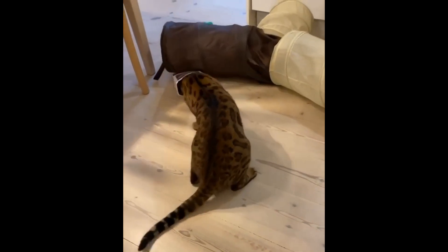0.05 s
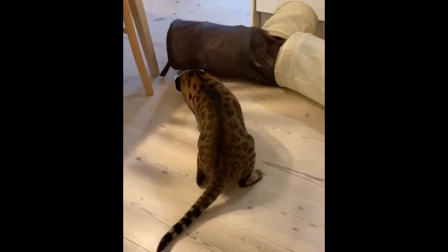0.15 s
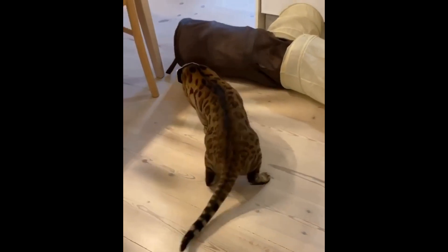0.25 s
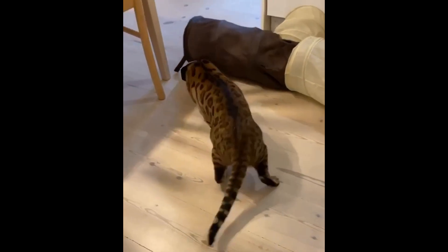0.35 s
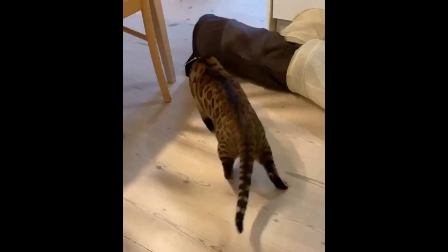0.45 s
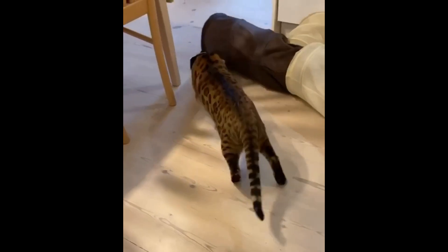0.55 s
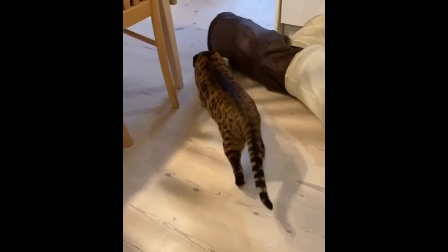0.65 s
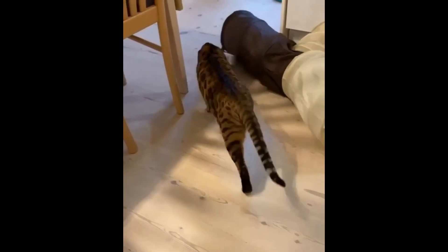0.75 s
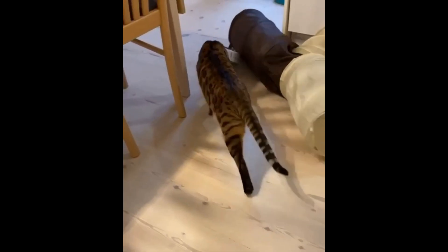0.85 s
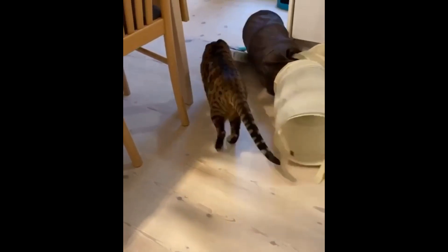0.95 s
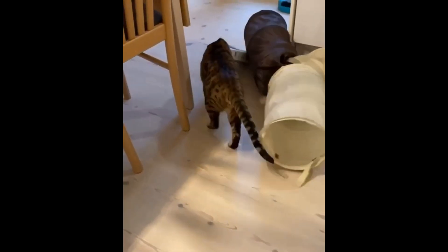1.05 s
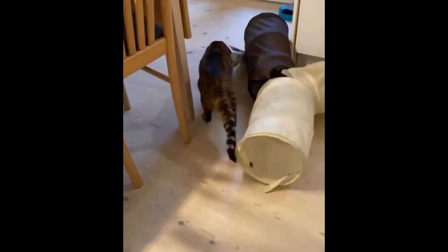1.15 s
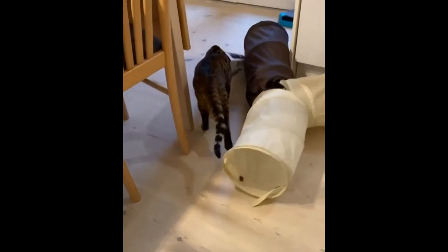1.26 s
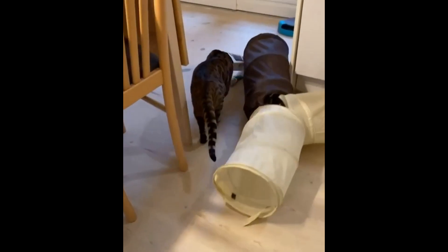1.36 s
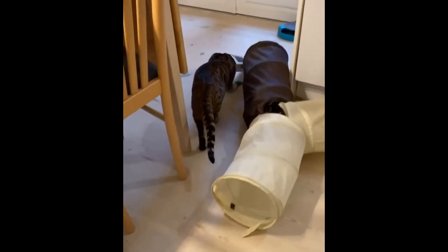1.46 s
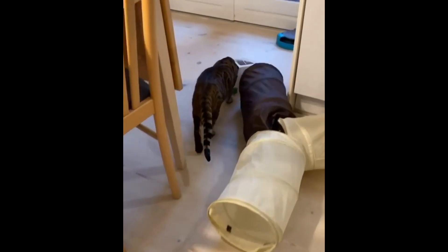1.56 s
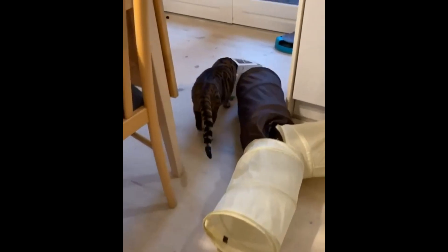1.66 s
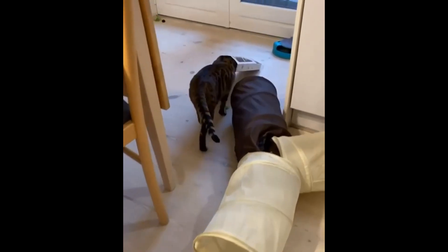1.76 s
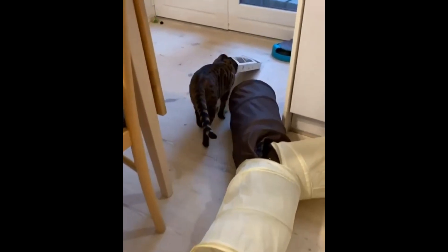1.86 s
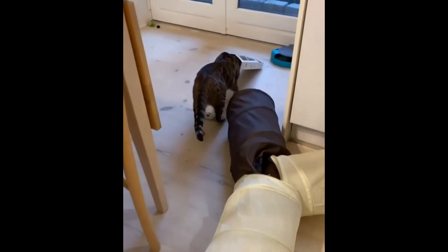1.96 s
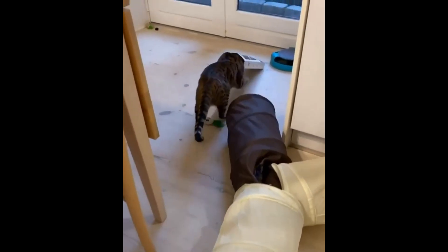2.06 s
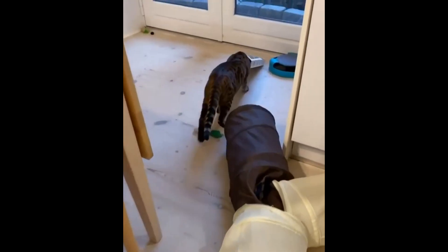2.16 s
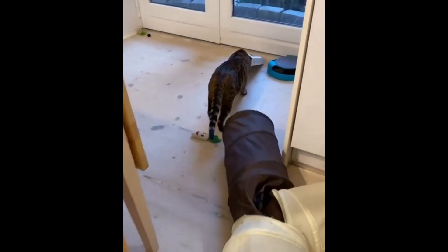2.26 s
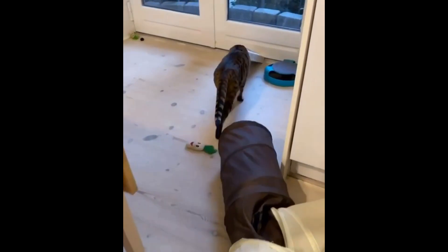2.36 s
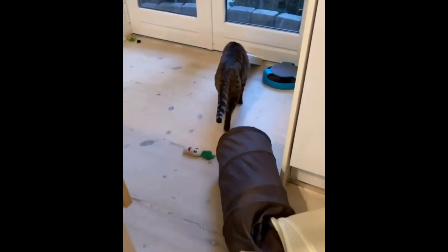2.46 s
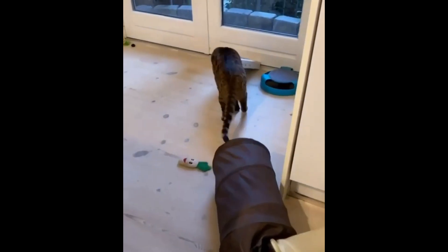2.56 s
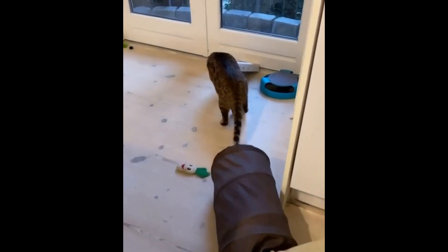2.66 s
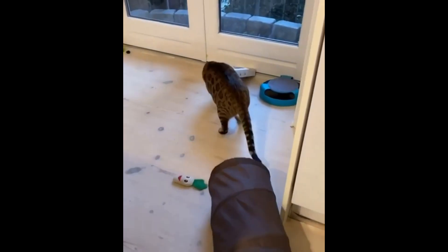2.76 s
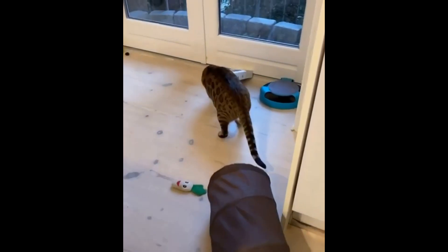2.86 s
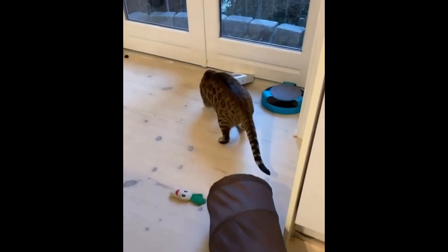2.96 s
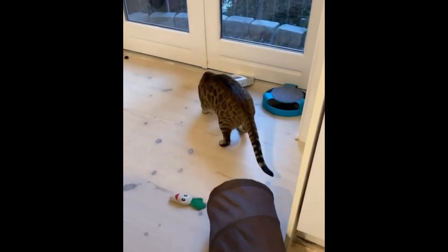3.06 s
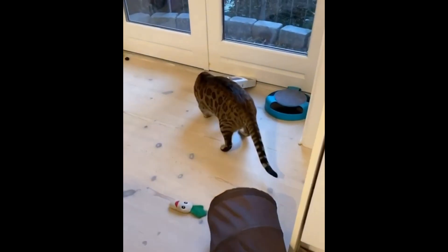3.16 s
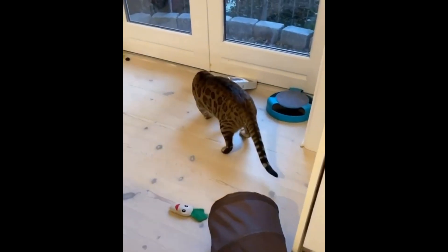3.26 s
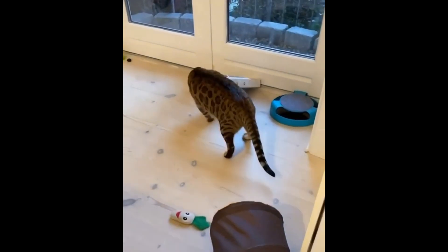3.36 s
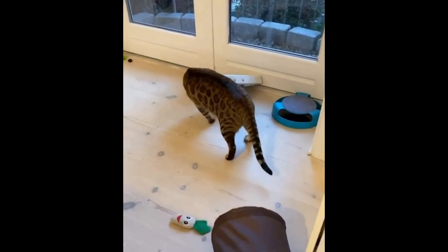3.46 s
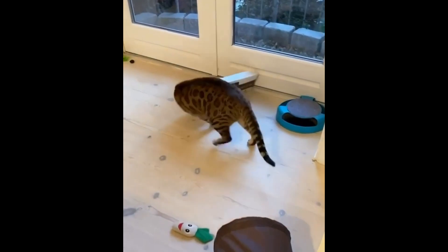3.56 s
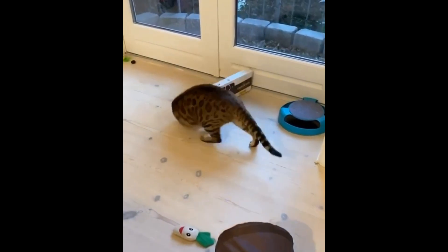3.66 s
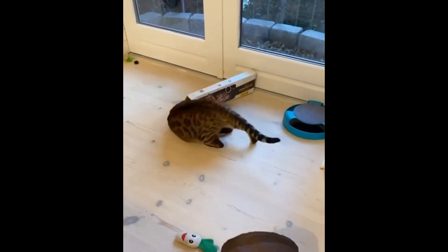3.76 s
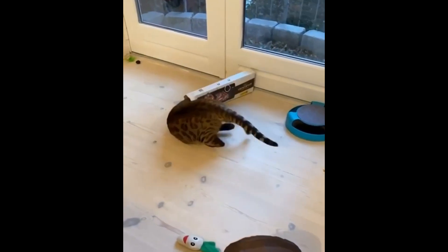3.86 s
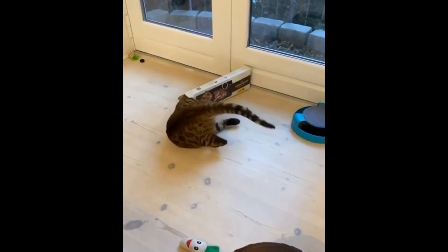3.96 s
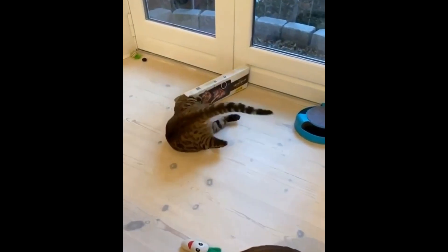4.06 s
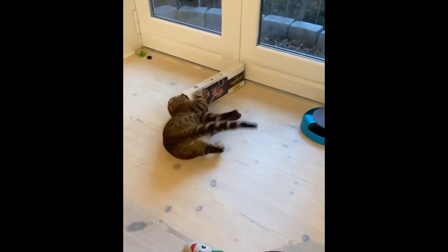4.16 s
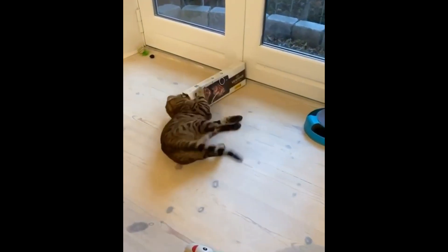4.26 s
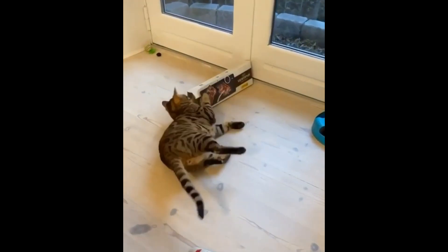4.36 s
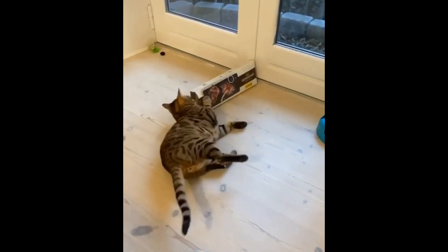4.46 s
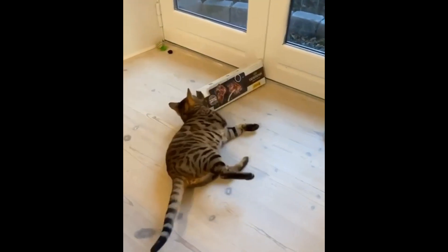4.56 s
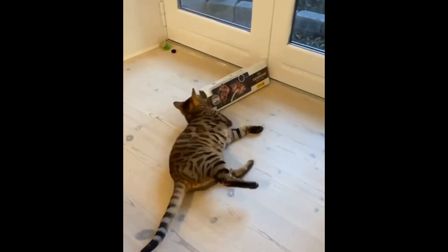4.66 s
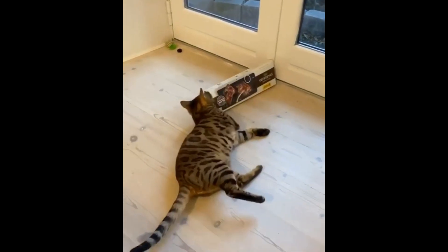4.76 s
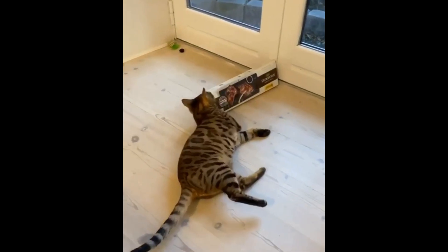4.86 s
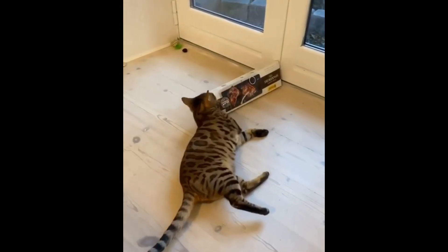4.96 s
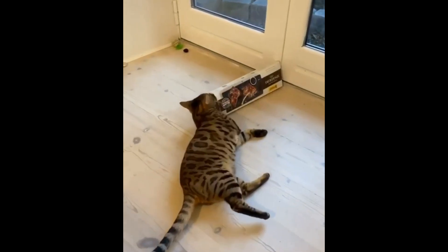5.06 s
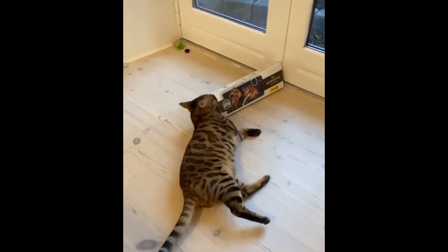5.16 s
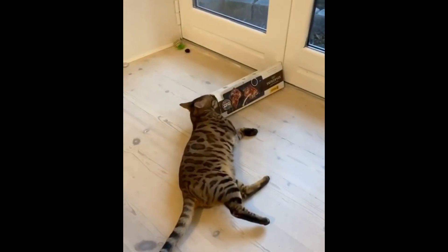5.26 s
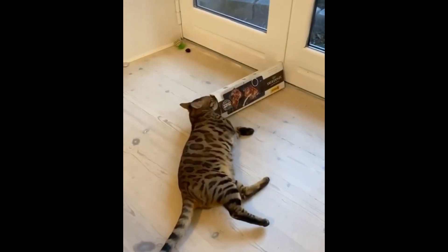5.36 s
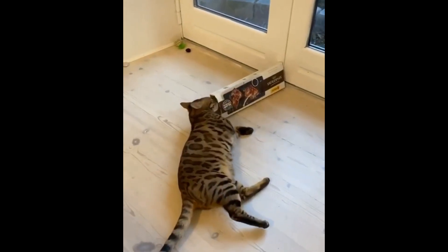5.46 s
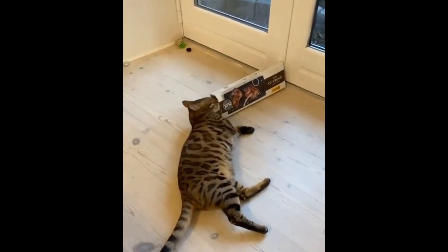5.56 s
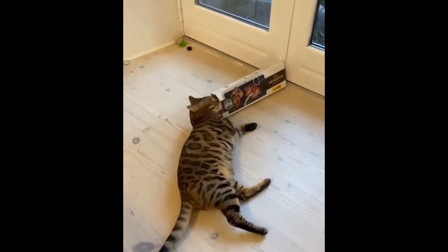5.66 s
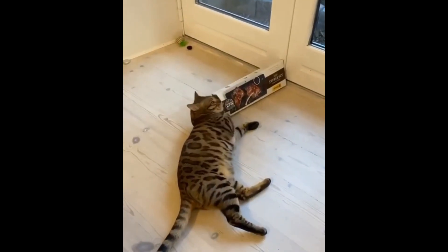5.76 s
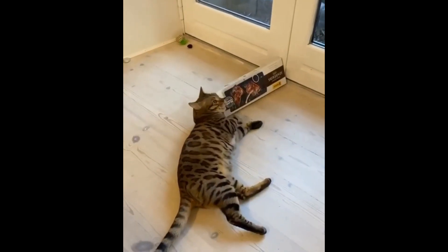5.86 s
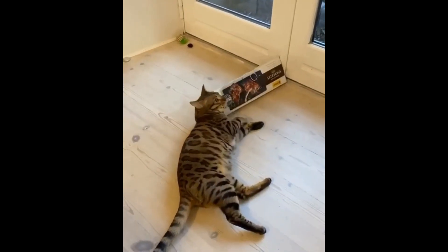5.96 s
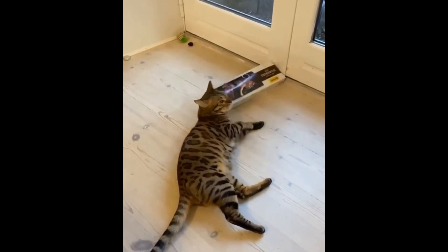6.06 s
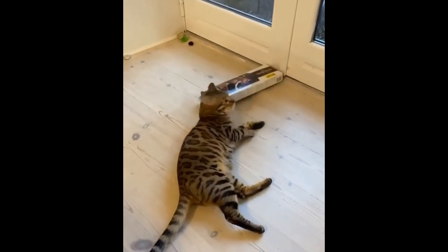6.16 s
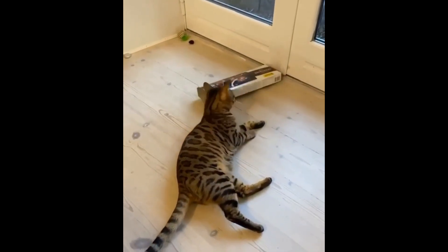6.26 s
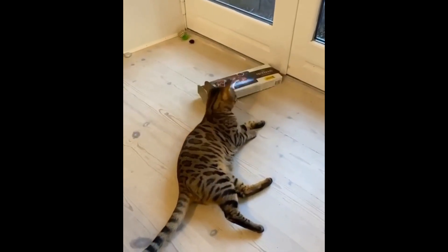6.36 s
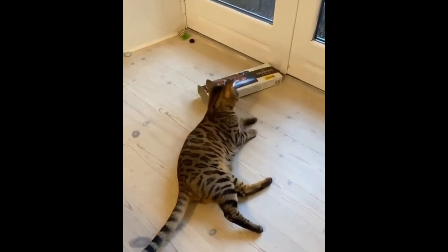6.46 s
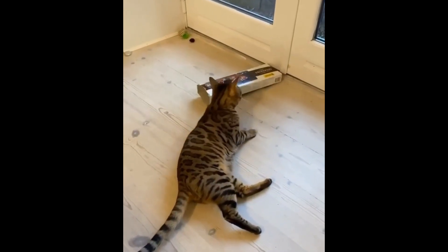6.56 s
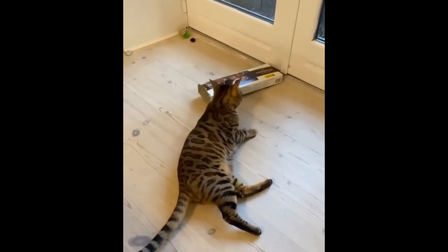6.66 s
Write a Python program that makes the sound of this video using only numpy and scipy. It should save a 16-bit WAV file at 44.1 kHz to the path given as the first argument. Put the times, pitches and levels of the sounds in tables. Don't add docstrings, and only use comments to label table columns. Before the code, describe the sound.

Indoors, cardboard scuffs and drags over bare boards, knocking four times, settling into near silence, before a sharp clicking knock and a last scrape.

```python
import sys
import numpy as np
from scipy import signal
from scipy.fft import rfft, irfft
from scipy.io import wavfile
from scipy.ndimage import uniform_filter1d

SR = 44100
rng = np.random.default_rng(int(sys.argv[2]) if len(sys.argv) > 2 else 0)


def put_to_file(sound):
    columns = np.atleast_2d(sound).T
    safe = np.clip(columns, -1, 1)
    whole_steps = np.round(safe * 32767)
    wavfile.write(sys.argv[1], SR, whole_steps.astype(np.int16))


def how_loud(loudness_db):
    steps = np.asarray(loudness_db, float) / 20
    return 10 ** steps


N = 296352

# [start t/s, length t/s, level/dB, box resonance f/Hz, upper panel level re box/dB]
SHOVES = [(0, 0.31, -58.5, 507, 2), (0.393, 0.4, -59, 520, -2), (0.788, 0.39, -56.5, 442, 3.5),
          (1.077, 0.076, -44, 512, -4), (1.24, 0.2, -61, 470, 1.5), (1.447, 0.065, -60.5, 580, 3),
          (1.573, 0.23, -67.5, 424, 3), (1.815, 0.17, -61, 527, -9), (2.16, 0.32, -68, 466, -3),
          (2.694, 0.1, -70.5, 490, -2), (2.933, 0.11, -60, 535, -1), (3.14, 0.055, -60, 586, -18),
          (3.434, 0.39, -65.5, 566, 8), (3.95, 0.058, -56, 496, -6), (4.058, 0.024, -49.5, 490, -10.5),
          (4.13, 0.17, -67, 534, -1.5), (4.4, 0.34, -77, 523, -17), (4.69, 0.074, -66, 473, -1.5),
          (4.85, 0.09, -78, 547, -6.5), (5.223, 0.16, -75, 527, -2.5), (5.832, 0.12, -72, 503, -5.5),
          (6.022, 0.12, -76, 540, 2), (6.17, 0.09, -62, 430, 4.5), (6.393, 0.12, -57, 430, 1.5),
          (6.632, 0.12, -63, 380, -16)]
# [t/s, level/dB]
SLIDE = [(0, -67), (.7, -65.5), (1.0, -55.5), (1.65, -64.5), (2.1, -69), (2.16, -67.5), (2.45, -67.5),
         (2.83, -73.5), (3.3, -88), (3.45, -73.5), (3.72, -63), (4.3, -70.5), (4.4, -76), (5.15, -99),
         (5.72, -92), (6.02, -67), (6.4, -59), (6.65, -96)]
# [start t/s, length t/s, level/dB]
SCUFFS = [(1.04, 0.016, -50), (1.12, 0.072, -58.5), (2.27, 0.028, -75), (2.89, .18, -71.5),
          (3.67, 0.065, -71), (4.22, 0.083, -71), (4.5, 0.26, -77), (4.7, 0.041, -68.5), (4.88, 0.057, -78),
          (6.03, 0.11, -66.5), (6.66, 0.028, -67.5)]
# [start t/s, length t/s, level/dB]
PAWS = [(.03, 0.18, -50), (.3, 0.48, -57), (.85, 0.37, -50), (1.2, 0.17, -56), (1.4, .13, -54.5),
        (1.58, 0.12, -58), (1.85, 0.21, -55), (2.2, 0.089, -59.5), (2.28, 0.3, -58.5), (2.68, 0.22, -55),
        (2.92, 0.049, -49.5), (3.0, 0.18, -63), (3.15, 0.23, -68), (3.43, 0.31, -60.5),
        (3.95, 0.084, -55.5), (4.08, 0.058, -62), (4.19, 0.12, -57), (4.38, 0.087, -61), (4.5, 0.045, -71),
        (4.6, 0.22, -65), (4.9, 0.18, -78), (5.85, 0.46, -71), (6.4, 0.15, -56), (6.62, 0.054, -54.5)]
# [f/Hz, density level/dB per Hz]
GRIT_SPECTRUM = [(150, -32), (250, -4.5), (443, -4.5), (522, -16.5), (576, -12), (867, -11.5), (1040, -4.5),
                 (9780, -14.5), (11700, -19), (12500, -105), (16200, -98), (22000, -120)]
# [f/Hz, density level/dB per Hz]
BOARD_SPECTRUM = [(15, -82), (25, -45), (54, -4), (128, -3), (263, -4.5), (356, -1), (400, -2), (520, -43),
                  (880, -120)]
# [t/s, blow level/dB, thud level re blow/dB, tick level re blow/dB, rattle length t/s]
KNOCKS = [
    (0.73, -35.5, -11.5, -15.5, 0.025),
    (1.675, -32.5, -11, -12.5, 0.021),
    (2.484, -31.5, -6, -12, 0.031),
    (3.746, -22, -7.5, -14.5, 0.019),
    (6.261, -27.5, -5.5, -11, 0.037),
    (6.523, -41, -5.5, -20, 0.018),
]
# [f/Hz, level/dB, t60 t/s]
LOW_RINGS = [
    [(152, 13.5, 0.2), (202, 0, 0.28), (318, -26, 5.0), (418, 4, 1.9)],
    [(149, 2.5, 0.19), (214, -30, 0.72), (310, 2.5, 0.18), (365, -1, 0.15)],
    [(90.2, -23, 0.76), (126, -3, 0.25), (185, 5.5, 0.38), (193, -16, 0.75), (380, 2, 0.34)],
    [(152, 5, 0.3), (184, 0.5, .5), (264, -21, 2.6), (344, -28, 0.8)],
    [(155, -3, 0.3), (272, -3, 0.94), (358, -6, 0.17), (350, -7, 0.18), (419, 4.5, .5)],
    [(108, -25, 5.0), (181, -5, 0.36), (350, 7, 0.34)],
]
# [f/Hz, level/dB, t60 t/s]
HIGH_RINGS = [
    [(696, -31, 0.77), (1420, -21, 2.0), (1690, -11, 0.056), (1990, 0.5, 2.5)],
    [(540, 5.5, 1.4), (1033, 1.5, 1.6), (1300, -5, 0.17), (1700, -32, 0.89)],
    [(470, 3, 0.079), (657, -14, 0.3), (970, -4, 0.99), (1900, -17, 0.24)],
    [(598, 5, 0.89), (718, 2, 0.19), (910, -47, 0.49), (1114, -24, 0.083), (1273, -12.5, 0.18),
     (2030, -16, 0.03)],
    [(503, -30, 0.99), (710, 8.5, 0.68), (1041, 5, 0.87), (1940, -24, 0.68)],
    [(490, -9, 0.16), (767, -2, 5.0), (1044, -36, 1.3)],
]
DULL_HZ = [2320, 2400, 1850, 2380, 1010, 930]
CRACK = [.47, 0.01, 0.37, 0.58, 0.29, 0.6]
# [t/s, blow level/dB, thud level re blow/dB, tick level re blow/dB, ring f/Hz]
TAPS = [(0.435, -53, -11, -29, 765), (0.548, -47.5, -7, -17, 745), (1.043, -49.5, -9.5, -4, 284),
        (1.437, -51, -34, -35, 810), (2.307, -55.5, -1, -13, 255), (2.856, -67, -16, -4, 598),
        (2.895, -49.5, -10.5, -11, 397), (2.939, -63, -14, -18, 250), (3.694, -48.5, -23.5, -11, 790),
        (4.058, -50.5, -8, -14.5, 468), (4.201, -53, -7, -33, 234), (6.156, -51.5, -14, -10, 816),
        (6.672, -70, 4, -14, 336)]
# [f/Hz, density level/dB per Hz]
CARD_SPECTRUM = [(25, -52), (45, -24.5), (150, -12.5), (600, -10), (1000, -17.5), (1700, -31),
                 (3000, -30.5), (6000, -59)]
# [f/Hz, density level/dB per Hz]
TICK_SPECTRUM = [(700, -9), (1300, 5.5), (2500, -2.5), (4500, -12), (7000, -20), (9500, -21), (11600, -31),
                 (12600, -63)]
# [t/s, level/dB, f/Hz, length t/s]
REBOUNDS = [(2.488, -34.5, 175, 0.015), (3.776, -24.5, 154, 0.022), (4.076, -47.5, 105, 0.013),
            (6.242, -42, 250, 0.018), (6.268, -32.5, 345, 0.024), (6.54, -47.5, 186, 0.021),
            (2.948, -62.5, 910, 0.036), (1.135, -46, 880, 0.022), (1.11, -46, 540, 0.029),
            (1.435, -46.5, 850, 0.011), (6.41, -53, 142, 0.03), (1.70, -50, 77.6, 0.062),
            (6.272, -40, 165, 0.023), (4.198, -53, 229, 0.018), (4.055, -51, 480, 0.015),
            (3.77, -36, 84, 0.029), (3.76, -46.5, 45, .05), (1.69, -54, 46, .04), (2.53, -47, 83, 0.045),
            (2.9, -53, 73, 0.031), (3.75, -29.5, 256, .007), (3.747, -32, 660, 0.012),
            (3.785, -35.5, 600, .016), (3.82, -38, 630, .016), (3.88, -47, 620, .025),
            (2.515, -39.5, 401, 0.013), (2.545, -41, 205, .014), (2.58, -44.5, 202, .014),
            (2.64, -51.5, 220, 0.028), (2.54, -52.5, 950, 0.012), (1.085, -51, 466, 0.011),
            (1.455, -53, 770, 0.011), (1.5, -54.5, 800, 0.013), (1.682, -38.5, 325, 0.01),
            (3.17, -61.5, 730, 0.028), (6.522, -47, 450, .008), (6.54, -47, 345, 0.014),
            (6.147, -54.5, 150, .02), (6.67, -57, 340, .015), (4.01, -51.5, 110, 0.032),
            (2.73, -56.5, 215, 0.029), (6.3, -38.5, 450, .014), (6.33, -40.5, 258, 0.018),
            (4.2, -55, 150, 0.046)]
# [t/s,
# level/dB, f/Hz, width f/Hz, length t/s]
TICKS_AND_RUSTLES = [(6.1585, -34.5, 4980, 420, 0.003), (6.159, -44, 7200, 1100, 0.0027),
                     (6.15, -44, 1500, 660, 0.016), (6.262, -31, 5760, 480, 0.0019),
                     (6.262, -29, 7530, 690, 0.0016), (6.262, -34.5, 10830, 1310, 0.00193),
                     (3.749, -43.5, 10200, 2600, 0.0087), (0.93, -66, 1680, 4600, 0.033),
                     (6.522, -59, 720, 300, 0.003), (2.6, -51, 2900, 3000, 0.0012), (0.68, -56, 4600, 3400, .014),
                     (1.667, -44, 2800, 3200, .012), (6.262, -44, 14000, 1500, .002), (5.492, -72, 2900, 500, .025),
                     (0.735, -48.5, 2500, 1800, .02), (1.677, -39, 3500, 1700, 0.014),
                     (1.695, -44.5, 3900, 2400, .02), (3.752, -48, 7600, 1300, 0.0055),
                     (3.755, -38.5, 1900, 1100, .02), (1.045, -56, 6600, 5000, .004),
                     (2.897, -54.5, 2600, 3400, .006), (2.856, -59, 2400, 1800, .005),
                     (2.97, -63, 1600, 1400, 0.055), (1.1, -52, 4500, 3000, .02), (3.76, -45.5, 2400, 1100, 0.032),
                     (1.47, -56, 1200, 400, .02), (2.895, -58, 6500, 1500, .004),
                     (2.896, -60, 4500, 700, .008), (2.894, -61, 9500, 2500, .005), (2.904, -62, 4500, 700, .025),
           (2.903, -64, 6600, 900, 0.023), (2.918, -66, 10000, 2500, 0.032),
           (6.158, -47, 9500, 900, 0.0038), (6.163, -47.5, 4900, 700, .018), (6.162, -49, 2110, 900, .02),
           (5.953, -65, 2500, 1200, 0.022), (5.99, -66, 3010, 1200, .03), (6.0, -58, 9400, 1800, .04),
           (6.04, -55, 8300, 1800, .05), (6.09, -58, 9500, 2500, .05), (6.11, -59, 6500, 1500, .04),
           (6.22, -54, 2260, 1200, 0.03), (6.268, -39, 3700, 700, .005), (6.27, -43, 7900, 900, .005),
           (1.676, -38, 2260, 1200, .006), (1.686, -37.5, 2240, 1200, 0.0075),
           (1.688, -40.5, 2900, 1400, 0.029), (1.72, -50.5, 3800, 2000, 0.044),
           (3.745, -28.5, 1040, 400, .004), (3.769, -38, 1304, 200, .018), (3.779, -36, 1760, 300, .012),
           (3.826, -43, 1334, 400, .01), (3.752, -30, 182, 50, 0.014), (3.78, -36, 365, 60, .016),
           (2.49, -37, 185, 50, .03), (5.5, -75.5, 1900, 500, 0.053), (3.75, -35, 1700, 800, 0.024),
           (3.79, -43, 1800, 900, 0.051), (.742, -49, 1700, 900, .04), (0.779, -56, 2000, 1000, 0.045),
           (1.461, -50.5, 1081, 300, .04), (5.953, -64, 7500, 2500, .04), (6.2, -55.5, 7400, 1500, .05),
           (6.23, -52, 4500, 2500, .03), (.726, -51, 2900, 1500, .006), (2.475, -49, 1800, 1800, .008),
           (6.291, -45, 5800, 1200, 0.023), (6.311, -42, 3300, 1200, 0.019),
           (6.365, -50.5, 5200, 1000, .02), (6.39, -49.5, 1300, 500, .035)]
# [t/s, level/dB, f/Hz, width f/Hz]
TAIL_SWEEP = [
    (5.47, -108, 2950, 1300),
    (5.495, -84, 2950, 1400),
    (5.54, -88, 2800, 1350),
    (5.575, -102, 2700, 1300),
    (5.595, -104, 2080, 350),
    (5.61, -90, 2060, 350),
    (5.67, -97, 2050, 350),
    (5.7, -89, 1920, 350),
    (5.76, -101, 1900, 350),
    (5.85, -108, 1900, 350),
]
# [f/Hz, t60 t/s]
ROOM_T60 = [(60, 0.46), (250, 0.43), (700, 0.42), (2000, 0.48), (6000, 0.45), (12000, 0.49)]
# [f/Hz, side minus mid level/dB]
WIDE = [(60, -18.5), (130, -14), (270, -5.5), (590, 2), (1250, 2), (2680, -0.5), (5740, 0.5), (12300, -25)]
# [f/Hz, left minus right level/dB]
LEAN = [(60, 0.5), (170, -2), (500, 2), (1460, 1.0), (4230, 1.5), (12300, -0.5)]
# [f/Hz, density level/dB per Hz]
AIR_SPECTRUM = [(15, -62.5), (40, 3.5), (147, 2), (200, -7.5), (296, -3.5), (472, -15.5), (597, -7),
                (662, -21), (928, -25), (1200, -20.5), (1560, -27), (1870, -30), (12500, -36.5),
                (16200, -84), (22000, -120)]
# [f/Hz, level/dB]
HUM = [(150.7, -80.5), (301.5, -89), (414.5, -87.5), (597.5, -80)]

AIR_DB = -70.5
PANEL_HZ = 733
EDGE_HZ = 11800
ATTACK_S, RELEASE_S = 0.022, 0.022
CHANGE_S = 0.024
RISE_SHARE, TAP_S = 0.23, 0.013


def drag():
    t = np.arange(N) / SR
    start, length, level, box_hz, panel_db = np.transpose(SHOVES)
    middle = start + length / 2
    box_hz, panel_db = np.interp(t, middle, box_hz), np.interp(t, middle, panel_db)
    slide = how_loud(np.interp(t, *np.transpose(SLIDE)))

    sizes = how_loud(2.5 * np.minimum(rng.exponential(1, N), 3.6))
    happens = rng.random(N) < 1500 / SR
    slips = sizes * happens * rng.choice([-1, 1], N)
    grip = how_loud(1.13 * evened(uniform_filter1d(rng.standard_normal(N), 900)))
    rub = grip * (evened(slips) + 0.6 * rng.standard_normal(N))

    hollow = evened(resonate(resonate(rub, box_hz, 210), box_hz, 300))
    panel = evened(resonate(resonate(rub, PANEL_HZ, 310), PANEL_HZ, 940))
    panel = panel + 0.6 * colour(rub, GRIT_SPECTRUM, lo_hz=900, hi_hz=1900)
    hiss = colour(rng.standard_normal(N) + 0.39 * rub, GRIT_SPECTRUM, lo_hz=1550)
    joists = evened(resonate(rub, 90, 25) + resonate(rub, 159, 27))
    rumble = how_loud(-2.0) * (colour(rub, BOARD_SPECTRUM, hi_hz=313) + 0.53 * joists)

    box_gain = strokes(zip(start, length, level)) + how_loud(-12.5) * slide
    box = box_gain * (hollow + how_loud(panel_db) * panel)
    return box + (slide + strokes(SCUFFS)) * hiss + strokes(PAWS) * rumble


def strokes(rows):
    t, gain = np.arange(N) / SR, np.zeros(N)
    for s, length, db in rows:
        swell = np.clip((t - s) / ATTACK_S + 1, 0, 1) ** 2
        fade = np.exp(-np.maximum(t - s - length, 0) / RELEASE_S)
        gain += how_loud(db) * swell * fade
    return gain


def knock(s, blow_db, thud_db, tick_db, length, rise, rings, dull_hz, crack=0.47):
    t = np.arange(16384) / SR
    onset = np.exp(-t / rise)
    shape = (1 - onset) * np.exp(-t / length) + crack * np.exp(-t / 0.0036)
    noise = rng.standard_normal(len(t))
    unevenness = evened(uniform_filter1d(rng.standard_normal(len(t)), 150))
    rattle = noise * how_loud(3.25 * unevenness)

    ring = np.zeros(len(t))
    for hz, db, t60 in rings:
        ring += how_loud(db) * evened(resonate(rattle * shape, hz, 34 + 1.45 / t60))
    body = evened(ring) + how_loud(-0.5) * evened(colour(rattle, CARD_SPECTRUM) * shape)
    body = signal.lfilter(*signal.butter(2, dull_hz, fs=SR), body)
    low = signal.lfilter(*signal.butter(2, 300, fs=SR), body)
    thud = low * (1 - np.exp(-t / 0.0048))

    tick_shape = (1 + 0.35 * crack - onset) * np.exp(-t / (0.53 * length))
    tick = colour(rattle, TICK_SPECTRUM, lo_hz=1500) * tick_shape
    layers = peaked(body - low) + how_loud(thud_db + 7.0) * peaked(thud) + how_loud(tick_db + 5.5) * peaked(tick)
    return s, how_loud(blow_db) * layers


def burst(hz, width, length):
    t = np.arange(8192) / SR
    push = rng.standard_normal(len(t)) + 0.13 * np.cos(2 * np.pi * hz * t)
    push = push * t / length * np.exp(-2 * t / length)
    return peaked(resonate(resonate(push, hz, width), hz, 3 * width))


def tail_sweep():
    s, *columns = np.transpose(TAIL_SWEEP)
    t = np.arange(s[0], s[-1], 1 / SR)
    db, hz, width = (np.interp(t, s, c) for c in columns)

    def brush(band):
        noise = rng.standard_normal(len(t))
        for _ in range(3):
            noise = resonate(noise, hz, band)
        return evened(noise)

    broad, narrow = brush(width.max()), brush(width.min())
    share = (width - width.min()) / np.ptp(width)
    return s[0], how_loud(db) * (np.sqrt(share) * broad + np.sqrt(1 - share) * narrow)


def room():
    taps = np.zeros((2, SR))
    slots = np.arange(160, SR - 20, 20)
    at = slots + rng.integers(0, 20, (2, len(slots)))
    np.put_along_axis(taps, at, rng.choice([-1., 1.], at.shape), 1)
    hz, t, z = signal.stft(taps, SR, nperseg=512)
    decay = how_loud(-60 * t / read(ROOM_T60, hz)[:, None])
    tail = signal.istft(z * decay, SR, nperseg=512)[1][:, :SR]
    direct = np.zeros_like(tail)
    direct[:, 16] = 1, 0.7
    direct, tail = ports(*direct), ports(*tail / np.linalg.norm(tail[0]))

    def heard(x, wet_db):
        response = (direct + how_loud(wet_db) * tail)[:, :SR * 2 // 3]
        return signal.fftconvolve(x[None], response, axes=1)

    return heard


def ports(a, b):
    hz = np.fft.rfftfreq(len(a), 1 / SR)
    wide, lean = how_loud(read(WIDE, hz)), how_loud(read(LEAN, hz) / 2)
    mid, side = rfft(a), 1j * rfft(b) * wide
    return irfft([(mid + side) * lean, (mid - side) / lean], len(a))


def lag(x):
    return np.array([(x[0] + np.roll(x[0], 1)) / 2, np.roll(x[1], 1)])


def air():
    t = np.arange(N) / SR
    still = colour(ports(*rng.standard_normal((2, N))), AIR_SPECTRUM)
    waver = evened(uniform_filter1d(rng.standard_normal((len(HUM), N)), 9000))
    hum = np.zeros(N)
    for (hz, db), w in zip(HUM, waver):
        hum += how_loud(db + 2 + 2.3 * w) * np.sin(2 * np.pi * hz * t + 0.73 * w)
    return how_loud(AIR_DB) * still + hum * how_loud([[1.5], [-1.5]])


def evened(x):
    return x / np.sqrt(np.mean(x ** 2) + 1e-20)


def peaked(x):
    return x / abs(x).max()


def read(points, hz):
    f, value = np.transpose(points)
    return np.interp(np.log(hz + 1), np.log(f + 1), value)


def colour(x, points, lo_hz=0., hi_hz=99500.0):
    hz = np.fft.rfftfreq(x.shape[-1], 1 / SR) + 1
    edges = 1 / np.sqrt((1 + (lo_hz / hz) ** 4) * (1 + (hz / hi_hz) ** 4))
    return evened(irfft(rfft(x) * how_loud(read(points, hz)) * edges, x.shape[-1]))


def resonate(x, hz, width):
    turn = np.exp(2j * np.pi * np.cumsum(hz * np.ones(len(x))) / SR)
    r = np.exp(-np.pi * width / SR)
    return 2 * (turn * signal.lfilter([1 - r], [1, -r], x / turn + 1e-18)).real


def add(mix, s, sound):
    part = mix[:, round(s * SR):][:, :sound.shape[1]]
    part += sound[:, :part.shape[1]]


def scene():
    rooms = [room() for _ in range(3)]
    t = np.arange(N) / SR
    mix = air()

    dragging = drag()
    for k, heard in enumerate(rooms):
        share = np.sqrt(2 / 3) * np.cos(np.pi * t / 0.9 + k * np.pi / 3)
        mix += how_loud(-9.0) * heard(dragging * share, wet_db=-0.5)[:, :N]

    blows = []
    for row, low, high, dull_hz, crack in zip(KNOCKS, LOW_RINGS, HIGH_RINGS, DULL_HZ, CRACK):
        blows.append(knock(*row, RISE_SHARE * row[-1], low + high, dull_hz, crack))
    for *row, hz in TAPS:
        rings = [(hz, 0, 0.06), (2.5 * hz, -8, 0.04)]
        blows.append(knock(*row, TAP_S, 0.0058, rings, 3.5 * hz))
    for s, db, hz, length in REBOUNDS:
        add(mix, s, how_loud(db + 2.5) * rooms[0](burst(hz, 45 + 0.06 * hz, length), wet_db=-6))
    blows.append(tail_sweep())
    struck = np.zeros((1, N))
    for s, sound in blows:
        add(struck, s, sound[None])

    deep = signal.filtfilt(*signal.butter(2, 260, fs=SR), struck[0])
    mix += how_loud(3.0) * rooms[0](deep, wet_db=-5)[:, :N]
    for k, heard in enumerate(rooms):
        share = np.sqrt(2 / 3) * abs(np.cos(np.pi * t / CHANGE_S + k * np.pi / 3))
        mix += how_loud(-1) * heard((struck[0] - deep) * share, wet_db=5.5)[:, :N]

    for k, (s, db, hz, width, length) in enumerate(TICKS_AND_RUSTLES):
        add(mix, s, how_loud(db) * lag(rooms[k % 3](burst(hz, width, length), wet_db=-12)))
    return mix


def thin_treble(x):
    hz, t, z = signal.stft(x, SR, nperseg=1024)
    f = hz[:, None]
    luck = rng.standard_normal((len(t) // 5 + 1, len(hz) // 5 + 1)).T
    luck = np.repeat(np.repeat(luck, 5, 0), 5, 1)[:len(hz), :len(t)]
    level_db = 10 * np.log10(uniform_filter1d((abs(z) ** 2).sum((0, 1)), 3) + 1e-14)
    need = 0.085 * (level_db - np.median(level_db)) * (f / EDGE_HZ) ** 3
    kept = (luck + need + 0.5 * f / EDGE_HZ < 1.5) | (f < 2800)
    top = (abs(z[:, hz > EDGE_HZ]) ** 2).sum((0, 1))
    sharp = top > 0.9 * top.max()
    z = z * np.where(kept | sharp, 1, how_loud(-30)) * ((f < EDGE_HZ) | sharp)
    return signal.istft(z, SR, nperseg=1024)[1][:, :N]


def roll_off(x):
    return signal.sosfilt(signal.butter(12, 12870, fs=SR, output="sos"), x)


def record(dry):
    mix = thin_treble(dry)
    return roll_off(mix)


dry = scene()
out = record(dry)
put_to_file(out)
```